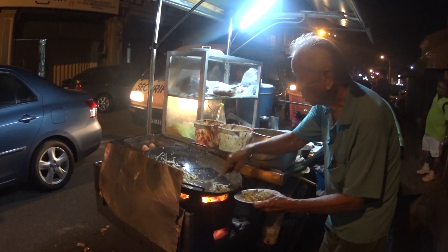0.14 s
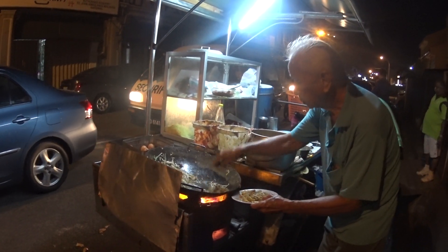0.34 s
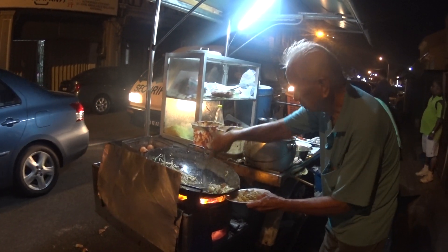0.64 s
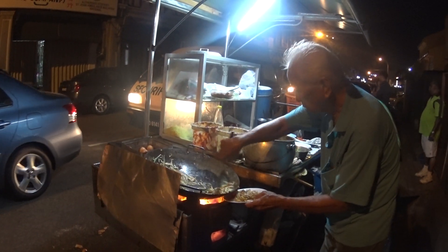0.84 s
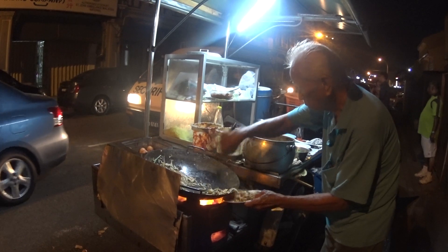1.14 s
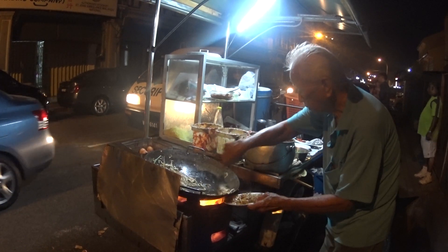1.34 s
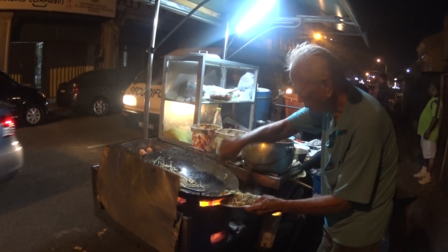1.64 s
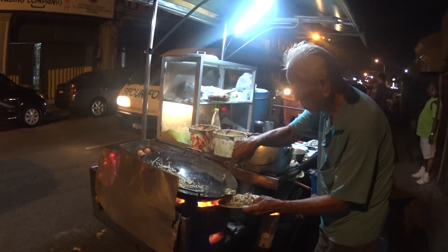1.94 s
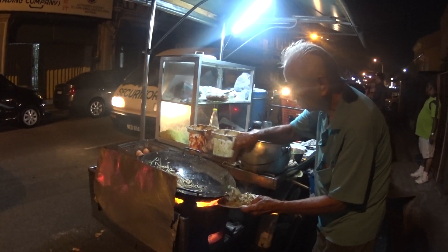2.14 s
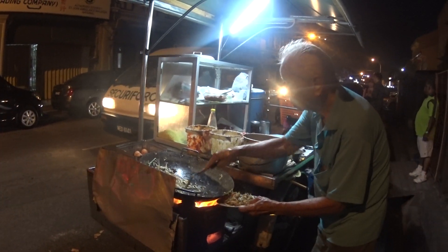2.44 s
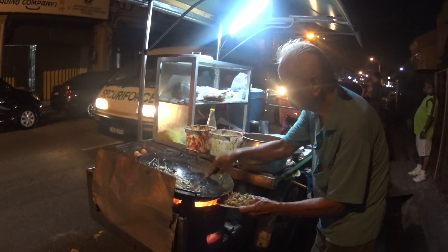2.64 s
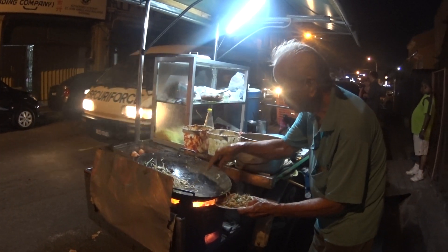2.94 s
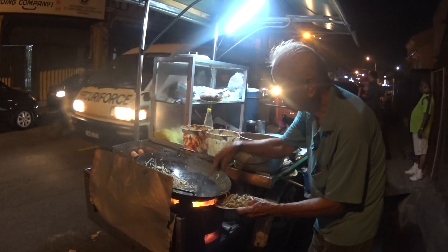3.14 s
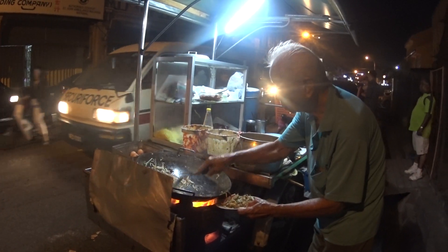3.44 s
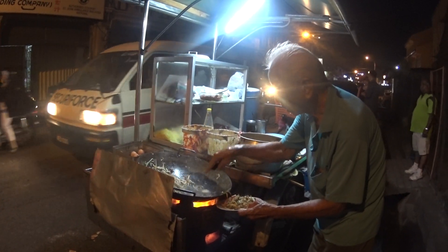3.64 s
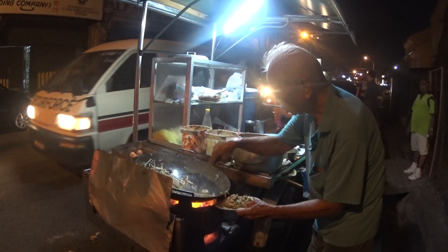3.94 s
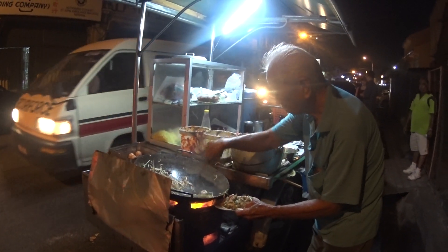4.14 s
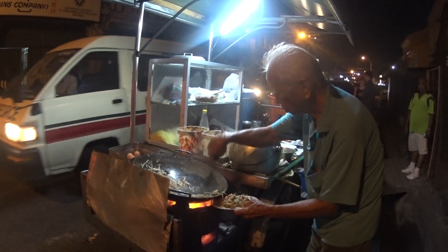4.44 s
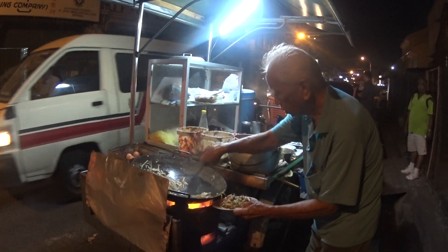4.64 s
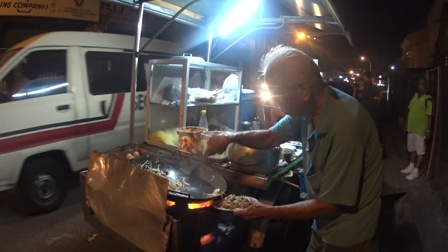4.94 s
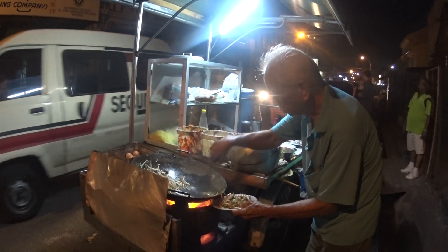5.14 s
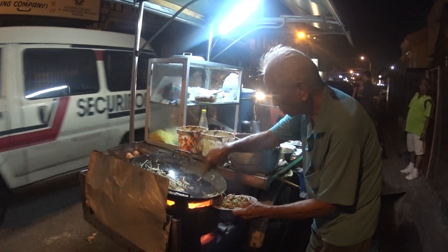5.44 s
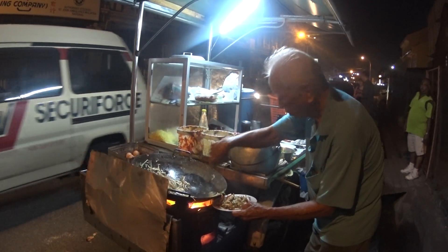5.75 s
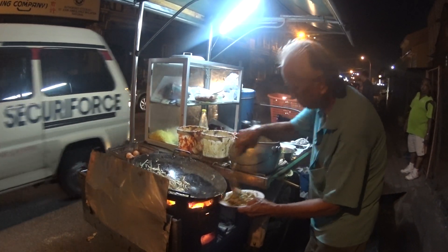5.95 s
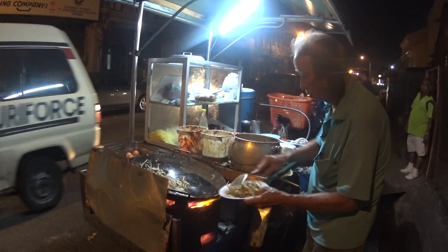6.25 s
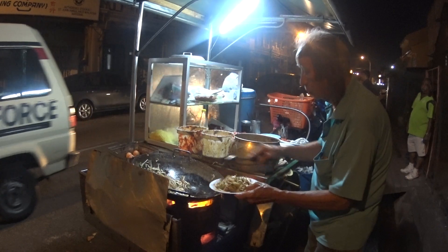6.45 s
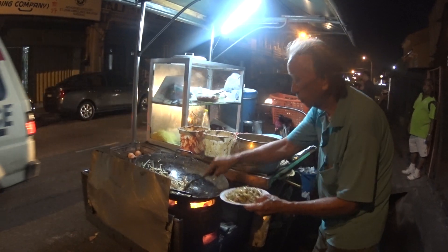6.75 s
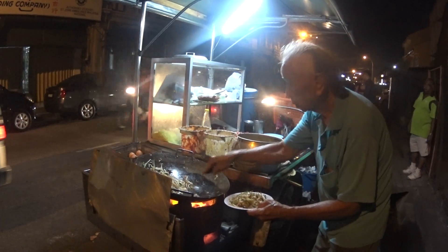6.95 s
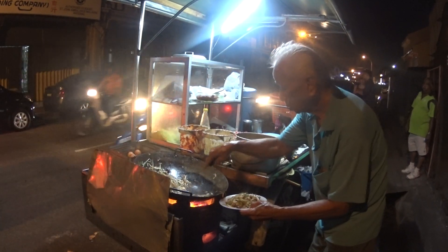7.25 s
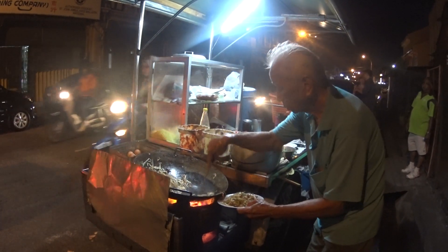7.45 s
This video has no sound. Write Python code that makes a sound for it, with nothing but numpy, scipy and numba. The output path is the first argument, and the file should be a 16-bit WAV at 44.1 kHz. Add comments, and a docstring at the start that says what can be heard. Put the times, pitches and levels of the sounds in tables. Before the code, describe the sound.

Noodles fry in a steel wok at a roadside stall, the sizzle flaring each time they are turned. A metal spatula clanks irregularly, each blow ringing briefly and running into a short scrape. Behind it, a van speeds up, eases off and crawls past among idling engines. Near the end the spatula taps a plate, a soft hiss swells, and the clanks resume. Heard close up, outdoors.

```python
"""Noodles sizzle in a steel wok over a charcoal stove at a roadside stall: steam bubbles burst in the oil,
and the frying flares each time the noodles are turned. A metal spatula clanks and scrapes through them,
ringing the wok, and taps the serving plate. In a lane about four metres off, a van speeds up, slows and
crawls past among idling traffic; a long, soft hiss rises as it passes. Heard from the stall through
a small camera's two microphone ports; its limiter ducks at every hard clank."""
import sys
import numpy as np
from scipy import signal
from scipy.fft import rfft, irfft
from scipy.io import wavfile
from scipy.ndimage import uniform_filter1d, minimum_filter1d
from numba import njit

SR = 44100
rng = np.random.default_rng(int(sys.argv[2]) if len(sys.argv) > 2 else 0)


def master_out(mix):
    """Clip the mix to full scale and print it as 16-bit PCM to the path in sys.argv[1]."""
    frames = np.transpose(np.atleast_2d(mix))
    ceiling = np.clip(frames, -1, 1)
    pcm = np.round(ceiling * 32767).astype(np.int16)
    wavfile.write(sys.argv[1], SR, pcm)


N = 334719
T = np.arange(N) / SR
RING = T[:int(.5 * SR)]  # time axis of one short sound

# The wok's ringing modes. Each row: frequency in Hz, level in dB, t60 in seconds.
WOK_MODES = [(1251, -3, 0.13), (1407, -2, 0.094), (1613, -6, 0.11), (1690, 3, 0.14), (1776, -7, 0.26),
             (2115, -9, 0.15), (2165, 1, .18), (2313, 4, 0.071), (2440, -11, 0.07), (2510, -5.5, 0.13),
             (2597, -9, 0.25), (2713, -6.5, 0.12), (3140, -12, .25), (3140, -23, 0.1), (3180, -27, .26),
             (3275, 0, 0.083), (3380, -13.5, 0.16), (3600, 0, 0.092), (3990, -5, 0.14), (4250, -6, 0.13),
             (5850, -1.5, 0.076)]
# The steel's crowded, food-damped overtones. Each row: frequency in Hz, level in dB.
STEEL_SPECTRUM = [(300, -57), (800, -4), (1080, -12), (1300, 6), (1750, 2.5), (2050, -2), (3100, 1.5),
                  (3700, 4), (4500, 4), (5900, 3), (7000, -6.5), (8600, -11.5), (11000, -8.5)]


def sizzle():
    """Countless steam bubbles burst in the oil and throw up fine spray; hiss and spray come in swells."""
    # Swells of hiss: frying flares with spray, and one long, soft hiss without spray as the van passes.
    # Each row: start in seconds, hold in seconds, hiss level in dB, spray level in dB.
    swells = [(0, 0.22, -31.5, -40.5), (.44, 0.061, -30.5, -36.5), (.76, .2, -37.5, -48),
              (2.62, 0.12, -32.5, -39), (2.835, 0.19, -28, -30.5), (3.03, .22, -29, -35),
              (3.51, 0.036, -23, -28.5), (3.68, 0.092, -29.5, -33), (3.999, .65, -32, -36.5),
              (5.17, 0.046, -30, -38), (6.299, 1, -34.5, -55), (7.05, .12, -29.5, -34)]
    # The hiss. Each row: frequency in Hz, level in dB.
    hiss_spectrum = [(1530, -7), (2600, 1), (2760, 1.5), (2930, -0.5), (3490, 0), (3780, -5), (4480, 5),
                     (5400, 6.5), (6310, 5), (7480, -3.5), (8850, -3.5), (9690, -2), (11000, -2.5),
                     (14300, -103), (22000, -120)]
    # The finest spray. Each row: frequency in Hz, level in dB.
    spray_spectrum = [(4000, -27), (6500, -17), (7500, 1.5), (9000, -6), (9700, 7.5), (11000, -4.5)]
    hiss_power, spray_power = undb(-32.5) ** 2, undb(-43) ** 2  # the simmer of noodles left alone
    for start, hold_s, hiss_db, spray_db in swells:
        envelope = swell(start, hold_s)
        hiss_power += (undb(hiss_db) * envelope) ** 2
        spray_power += (undb(spray_db) * envelope ** 1.3) ** 2  # spray falls off faster than hiss
    hiss = unit(colour(grains(N, per_s=16000, spread_db=2.0), hiss_spectrum))
    spray = unit(colour(grains(N, per_s=9400, spread_db=3.0), spray_spectrum))
    flutter = undb(.5 * walk(22))
    return (hiss * np.sqrt(hiss_power) + spray * np.sqrt(spray_power)) * flutter


def swell(start, hold_s, rise_s=0.021, drop_s=0.078, linger_s=0.48):
    """The level jumps up, holds, then drops a little and lingers."""
    rise = np.clip((T - start) / rise_s, 0, 1)
    after_s = np.maximum(T - start - hold_s, 0)
    lingering = undb(-1.5)
    return rise * ((1 - lingering) * np.exp(-after_s / drop_s) + lingering * np.exp(-after_s / linger_s))


def spatula():
    """Each blow runs into a slide under the noodles; lone strokes and taps on the plate come between."""
    # Blows on the wok. Each row: start in seconds, level in dB, blade resonance in Hz, its width in Hz,
    # its relative level in dB, chatter length in seconds, level of the following slide in dB.
    blows = [(0.158, -10.5, 2870, 900, -4, 0.042, -29), (0.402, -18, 2440, 750, 6, 0.029, -25),
             (0.759, -24, 2490, 400, -2, 0.0044, -39), (1.285, -16.5, 3070, 446, -2.5, .007, -29.5),
             (1.75, -23.5, 2674, 396, 6.5, 0.0098, -46), (2.308, -18, 3270, 439, 2, .016, -33),
             (2.61, -16, 2620, 636, 5, 0.02, -26.5), (3.191, -24.5, 2536, 320, 13.5, .043, -25.5),
             (3.774, -13, 2910, 700, -3, 0.043, -33), (4.031, -17.5, 2580, 330, 3.5, 0.026, -29),
             (4.231, -22, 3000, 551, 4.5, .008, -41), (4.493, -16.5, 3360, 500, -3, 0.024, -26.5),
             (4.747, -27.5, 2700, 597, 2, .008, -33), (4.791, -30.5, 2400, 600, -1, .02, -45),
             (5.149, -21.5, 3320, 553, -4.5, 0.0069, -29.5), (5.203, -29, 3300, 550, -8, .01, -46),
             (5.463, -15, 2740, 696, 2, .04, -30), (5.701, -21, 2570, 240, 9.5, 0.017, -28.5),
             (6.821, -27, 2636, 900, 5.5, 0.0053, -32), (7.064, -21.5, 2560, 500, 4, 0.0079, -33),
             (7.383, -14, 2830, 650, 0.5, 0.041, -27)]
    # Strokes without a blow. Each row: start and length in seconds, level in dB, blade resonance in Hz.
    strokes = [(0.831, .13, -32, 1700), (0.999, 0.094, -29.5, 3160), (1.431, 0.12, -29.5, 1630),
               (2.832, 0.067, -25, 2300), (3.377, 0.17, -29.5, 2300), (3.532, .06, -22, 2270),
               (3.745, .05, -29, 2700), (5.996, .14, -37, 1940)]
    # Taps on the serving plate. Each row: start in seconds, level in dB.
    taps = [(6.134, -12.5), (6.141, -23), (6.151, -20)]
    out = np.zeros(N)
    for start, db, blade_hz, width_hz, blade_db, chatter_s, slide_db in blows:
        tilt_db = 0.63 * (-17 - db)  # harder blows sound duller
        add(out, start, undb(db) * clank(blade_hz, width_hz, blade_db, chatter_s, tilt_db))
        add(out, start + .03, undb(slide_db) * scrape(length_s=0.089, blade_hz=blade_hz))
    for start, length_s, db, blade_hz in strokes:
        add(out, start, undb(db) * scrape(length_s, blade_hz))
    for start, db in taps:
        add(out, start, undb(db) * plate_tap())
    return out


def clank(blade_hz, width_hz, blade_db, chatter_s, tilt_db):
    """The blade lands and chatters; its resonance, set by how it meets the wok, favours nearby modes."""
    count = len(RING)
    contact = grains(count, per_s=1500, spread_db=0.5) * np.exp(-(RING / chatter_s) ** 4) * undb(-15)
    contact[0] += undb(9.5)  # the landing itself

    def crowded_modes(short_t60, long_db, long_t60):
        """The energy of each small impact adds up and dies away as noise."""
        decay = fade(short_t60) + undb(long_db) * fade(long_t60)
        energy = signal.fftconvolve(contact ** 2, decay ** 2)[:count]
        return rng.standard_normal(count) * np.sqrt(abs(energy))

    def blade(x):
        """The steep resonance of the spatula's blade."""
        return unit_hit(band(band(x, blade_hz, width_hz), blade_hz, 1.04 * width_hz))

    clash = unit_hit(colour(crowded_modes(short_t60=0.068, long_db=-25, long_t60=0.39), STEEL_SPECTRUM))
    wok = unit_hit(signal.fftconvolve(contact, ring(WOK_MODES, scatter_db=2.5))[:count])
    ping = unit_hit(blade(crowded_modes(short_t60=0.069, long_db=-17, long_t60=0.41)) + blade(wok))
    tick = unit_hit(band(rng.standard_normal(count), hz=5500, width_hz=7000) * fade(t60=.012))
    tilt = [(750, -tilt_db), (12000, tilt_db)]
    return colour(clash + undb(-0.5) * wok + undb(-15.5) * tick, tilt) + undb(blade_db) * ping


def scrape(length_s, blade_hz):
    """Stick-slip clicks excite the steel, the blade and the wok's modes during one push."""
    slips = grains(len(RING), per_s=2500, spread_db=.5)
    steel = unit(colour(slips, STEEL_SPECTRUM))
    blade = unit(band(slips, blade_hz, width_hz=300))
    wok = unit(signal.fftconvolve(slips, ring(WOK_MODES, scatter_db=4.5))[:len(RING)])
    progress = np.clip(RING / length_s, 0, 1)
    pressure = np.sin(np.pi * progress ** .6).clip(0) ** 0.46  # quick rise, slower release
    return unit(steel + undb(1) * blade + undb(-7.5) * wok) * pressure


def plate_tap():
    """A dry crack and a short clink; the hand and the food damp the plate."""
    # The serving plate's modes. Each row: frequency in Hz, level in dB, t60 in seconds.
    plate_modes = [(2100, 3, .043), (2690, -4, .041), (3530, -4.5, 0.051), (4340, -5, 0.047),
                   (4500, -2, .045), (5000, -7, 0.042), (6000, 3, .03), (9600, -3, .02)]
    crack = colour(rng.standard_normal(len(RING)), STEEL_SPECTRUM) * fade(t60=0.065)
    clink = ring(plate_modes, scatter_db=6.5)
    return unit_hit(unit_hit(clink) + unit_hit(crack))


def stirring():
    """Noodles and the resting blade keep nudging the wok's lower modes, in fits and starts."""
    fits = undb(2.5 * walk(12))
    nudges = grains(N, per_s=700, spread_db=3.5) * fits
    low_ring = ring([mode for mode in WOK_MODES if mode[0] < 2650], scatter_db=1)
    return undb(-37.5) * unit(signal.fftconvolve(nudges, low_ring)[:N])


def van_and_street(idle_hz=29, revved_hz=36.5):
    """Over the street's wash, tyres swell as the van nears; its engine and rumble follow the revs."""
    # The van speeds up, eases off and rolls by. Each row: time in seconds, firing rate in Hz.
    firing_rates = [(0, 29.05), (1.2, 29.25), (1.7, 33.77), (2.6, 36.08), (3.7, 36.5), (4.4, 34.82),
                    (5.0, 27.25), (5.75, 29.66), (7.59, 26.16)]
    # Its engine's tones. Each row: multiple of the firing rate, level in dB.
    van_orders = [(3, -4.5), (4, -2), (5, -9), (6, -1), (7, -0.5), (8, -6.5), (9, -8), (10, -16)]
    # Tyres and street wash. Each row: frequency in Hz, level in dB.
    wash_spectrum = [(250, -16), (450, -7.5), (680, -8), (850, -4.5), (1100, -8), (1330, 3.5), (1520, 1),
                     (1700, 1), (1900, 2), (2350, 2), (2900, -5.5), (3800, -8), (4600, -4.5), (7000, -63)]
    # Engine rumble. Each row: frequency in Hz, level in dB.
    rumble_spectrum = [(41, -54), (70, -9), (135, 4), (173, -3.5), (294, -3.5), (382, -8.5), (700, -13.5),
                       (910, -58), (1540, -120)]
    # Steady deep bass and the van's exhaust. Each row: frequency in Hz, level in dB.
    bass_spectrum = [(10, -12), (28, -8), (55, -7), (100, -3), (300, -44)]
    firing_hz = np.interp(T, *np.transpose(firing_rates))
    revs = (firing_hz - idle_hz) / (revved_hz - idle_hz)
    near = nearness(passes_s=5.9)
    tyre_gain = undb(-29.5) * near
    exhaust_gain = undb(-43) * nearness(passes_s=7.5) ** 2  # heard only close by
    wash = noise(wash_spectrum) * np.hypot(undb(-33), tyre_gain) * undb(.7 * walk(11))
    rumble = noise(rumble_spectrum) * undb(-37 + 0.8 * revs + 0.15 * walk(16))
    bass = noise(bass_spectrum) * np.hypot(undb(-56.5), exhaust_gain)
    pull_hz_per_s = uniform_filter1d(np.gradient(firing_hz) * SR, size=SR // 3)
    engine_gain = undb(-40.5 + 6.5 * revs + 0.52 * pull_hz_per_s) * near  # louder while speeding up
    return wash + rumble + bass + engine(firing_hz, van_orders, waver_db=1) * engine_gain


def idlers():
    """Idling engines roll by, their exhausts heard only close to the stall."""
    # Passing vehicles. Each row: time when nearest in seconds, firing rate in Hz, level there in dB.
    passes = [(.6, 29.43, -45.5), (6.15, 29.04, -42)]
    # An idling engine's tones. Each row: multiple of the firing rate, level in dB.
    idle_orders = [(2, -2.5), (3, -7), (5, 1.5)]
    return sum(engine(hz, idle_orders, waver_db=4) * undb(db) * nearness(passes_s) ** 2
               for passes_s, hz, db in passes)


def engine(firing_hz, orders, waver_db):
    """Low orders of a slowly rolling engine, each wavering by itself."""
    phase = 2 * np.pi * np.cumsum(firing_hz * (1 + 0.00301 * walk(8))) / SR
    return unit(sum(undb(db + waver_db * walk(8.2)) * np.sin(order * phase + 2 * np.pi * rng.random())
                    for order, db in orders))


def nearness(passes_s, lane_m=3.84, crawl_m_s=2.02):
    """Gain of something crawling along the lane: inverse to its distance, 1 at its nearest."""
    return lane_m / np.hypot(lane_m, crawl_m_s * (T - passes_s))


def street():
    """The traffic beside the stall, with a few dull knocks."""
    # Low thuds. Each row: start in seconds, level in dB, pitch in Hz.
    thuds = [(2.884, -31, 85), (4.946, -30, 70), (5.265, -30, 95), (7.04, -30, 55.3)]
    out = van_and_street() + idlers()
    for start, db, hz in thuds:
        thud = np.sin(2 * np.pi * hz * RING) * fade(t60=.087) * (1 - fade(t60=.012))
        add(out, start, undb(db) * unit_hit(thud))
    return out


def echo(x):
    """Sound scatters off the stall and its awning."""
    stall = rng.standard_normal(len(RING)) * fade(t60=0.26) * (RING > .004)
    return signal.fftconvolve(x, stall / np.linalg.norm(stall))[:N]


def undb(db):
    """Decibels to gain."""
    return 10 ** (np.asarray(db) / 20)


def unit(x):
    """Scale to rms 1."""
    return x / np.sqrt(np.mean(x ** 2))


def unit_hit(x):
    """Scale a short sound to the energy of 20 ms at rms 1."""
    return x / np.sqrt(np.sum(x ** 2) / (.02 * SR))


def over_pitch(table, count):
    """The columns of a frequency table on the bins of a sound of count samples."""
    hz, *columns = np.transpose(table)
    log_bins = np.log(np.fft.rfftfreq(count, 1 / SR) + 1)
    return [np.interp(log_bins, np.log(hz), column) for column in columns]


def colour(x, spectrum):
    """Filter a sound by a curve of (Hz, dB) points."""
    return irfft(rfft(x) * undb(over_pitch(spectrum, len(x))[0]), len(x))


def noise(spectrum):
    """Steady noise with the given spectrum, at rms 1."""
    return unit(colour(rng.standard_normal(N), spectrum))


def band(x, hz, width_hz):
    """One resonance."""
    return signal.lfilter(*signal.iirpeak(hz, hz / width_hz, fs=SR), x)


def walk(per_s):
    """A slow random drift with a spread near 1."""
    hold = int(SR / per_s)
    steps = np.repeat(rng.standard_normal(N // hold + 1), hold)
    return 1.3 * uniform_filter1d(uniform_filter1d(steps, hold), hold)[:N]


def grains(count, per_s, spread_db):
    """Random clicks, mostly small and a few large."""
    size = undb(spread_db * np.minimum(rng.exponential(size=count), 6))
    return unit((rng.random(count) < per_s / SR) * size * rng.standard_normal(count))


def fade(t60):
    """An exponential decay, 60 dB down after t60 seconds."""
    return np.exp(-np.log(1000) * RING / t60)


def ring(modes, scatter_db):
    """Modes struck at a random place."""
    chance = rng.standard_normal((len(modes), 3))
    return sum(undb(db + scatter_db * lift) * fade(t60)
               * np.sin(2 * np.pi * (hz * (1 + 0.0013 * detune) * RING + phase))
               for (hz, db, t60), (lift, detune, phase) in zip(modes, chance))


def add(track, start, x):
    """Mix a sound in at a start time in seconds."""
    i = max(int(start * SR), 0)
    track[i:i + len(x)] += x[:N - i]


@njit
def follow(x, attack, release):
    """A level follower that rises fast and falls slowly."""
    out, level = np.empty(len(x)), 0.
    for i in range(len(x)):
        level += (x[i] - level) * (attack if x[i] > level else release)
        out[i] = level
    return out


def limiter(x, ceiling_db, attack_s, release_s):
    """Turn everything down while the peaks exceed the ceiling, looking a moment ahead."""
    ahead = -minimum_filter1d(-abs(x).max(axis=0), size=24)
    peak = follow(ahead, 1 - np.exp(-1 / (attack_s * SR)), 1 - np.exp(-1 / (release_s * SR)))
    return x / np.maximum(1, peak / undb(ceiling_db))


def scene():
    """Everything reaches the left port a little earlier; scattered sound differs between the ports."""
    # The camera's two microphone ports. Each row: frequency in Hz, the left's phase lead in radians,
    # left minus right in dB, likeness from 0 to 1.
    port_response = [(30, .05, -.8, 1), (130, 0.53, -.5, 1), (344, 1.05, -0.5, 0.92), (774, 1.66, 0, 0.97),
                     (1680, 1.25, .5, 0.9), (2400, 1.56, 2, 0.86), (3320, .48, 2, 0.58),
                     (3950, 0.87, .5, 0.64), (4300, 0.74, 2.5, 1), (5800, 0.54, 0, 0.88),
                     (8200, 0.26, 1.5, 0.43), (8600, .14, 1.5, .8), (11000, 0.68, 0, 0.92)]
    metal = spatula() + stirring()
    direct = rfft(metal + undb(-24) * echo(metal) + sizzle() + street())
    scattered = rfft(undb(-3.5) * echo(metal) + sizzle() + street())
    lead, left_db, likeness = over_pitch(port_response, N)
    sides = np.array([[1], [-1]])
    ports = np.sqrt((1 + likeness) / 2) * direct + sides * np.sqrt((1 - likeness) / 2) * scattered
    return irfft(ports * np.exp(.5j * sides * lead) * undb(sides * left_db / 2), N)


def record(dry):
    """The camera limits the clanks and cuts the treble above 11 kHz."""
    held = limiter(dry, ceiling_db=-5.0, attack_s=.00008, release_s=0.038)
    return signal.sosfilt(signal.ellip(12, .2, 80, 11070, fs=SR, output="sos"), held)


dry = scene()
out = record(dry)
master_out(out)
```